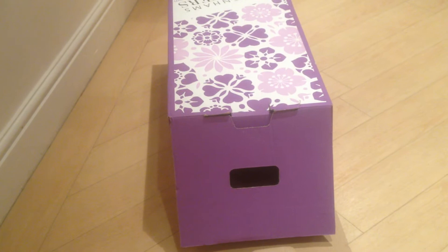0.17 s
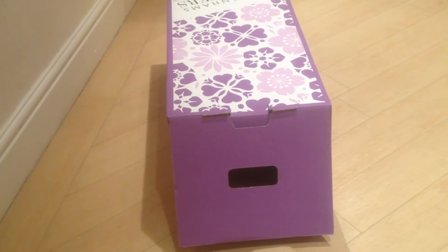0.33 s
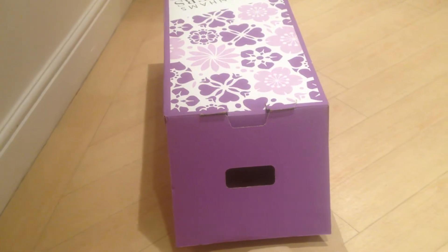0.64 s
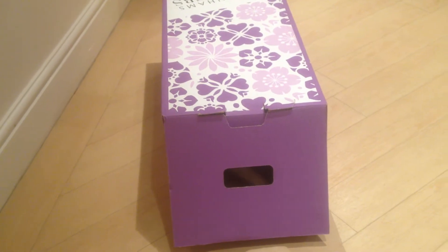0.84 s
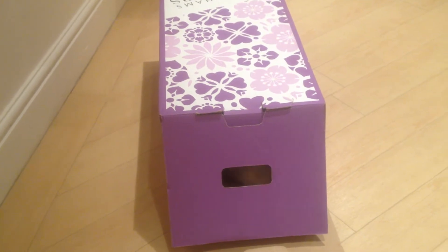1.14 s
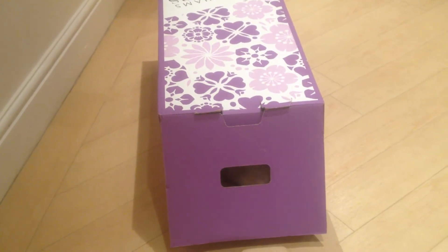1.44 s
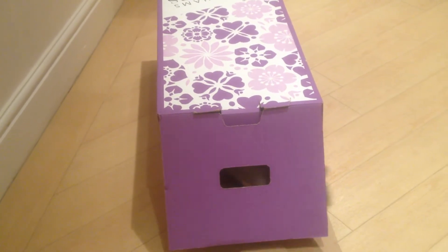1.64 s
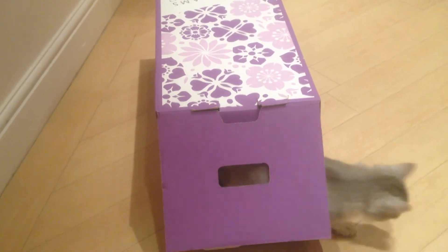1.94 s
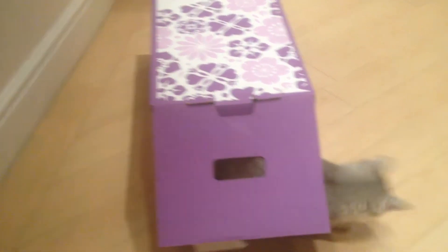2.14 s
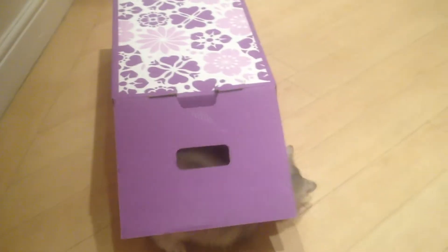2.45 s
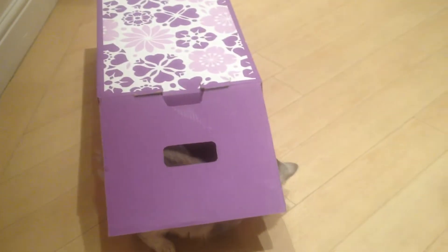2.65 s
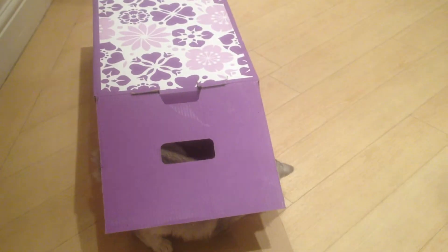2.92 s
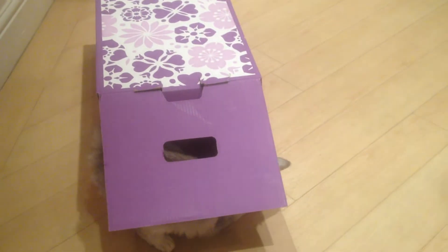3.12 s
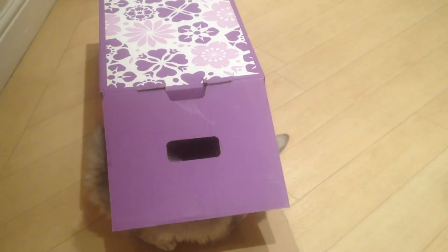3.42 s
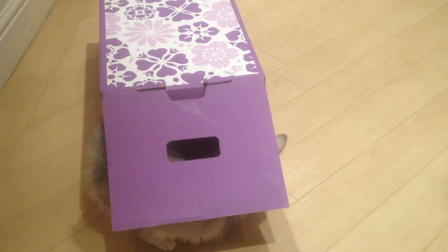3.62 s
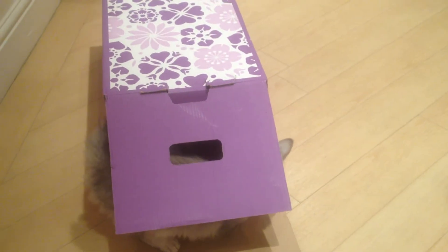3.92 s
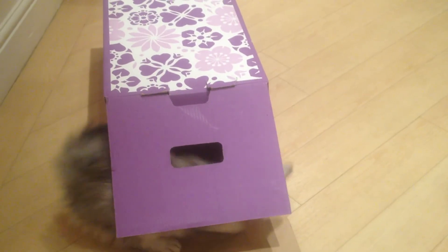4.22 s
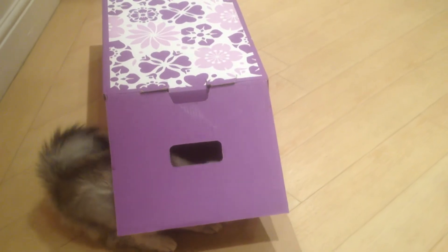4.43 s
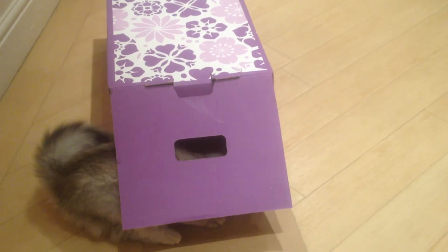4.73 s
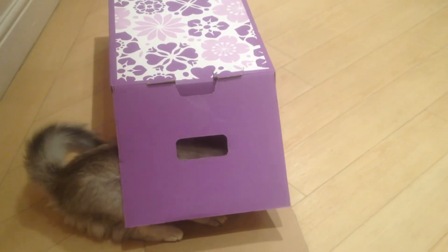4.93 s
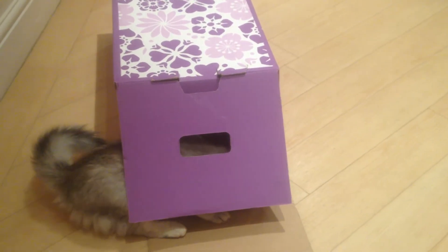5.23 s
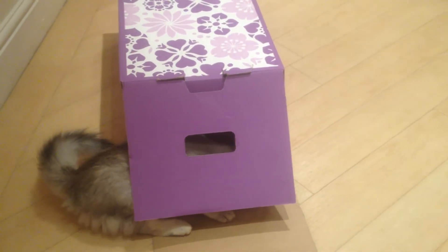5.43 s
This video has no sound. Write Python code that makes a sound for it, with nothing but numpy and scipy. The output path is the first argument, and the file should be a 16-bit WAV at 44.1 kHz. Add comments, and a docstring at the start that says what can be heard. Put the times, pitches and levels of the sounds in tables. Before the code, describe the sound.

Near-quiet room with a faint wavering low hum for a second. Then a kitten stirs in a cardboard box: rustles, a light knock, quick claw scratches. A dry flick and dull thuds follow, then a loud hollow clatter as the box corner drops on the wooden floor. Soft brushing continues, and finally the rim judders along in crisp snaps. Close small mono microphone, live reverberant room.

```python
"""A kitten shuffles about under an upturned cardboard box on a wooden floor, in a live room.
Claws scratch and fur brushes the card: filtered random catches under stroke envelopes.
Knocks, ringing panels and a flick are clicks or noise bursts through resonances; thuds are dying sines.
Late on, the box judders along on its rim: a row of edge snaps over fine scrabbling.
An appliance hums in the background: wavering sines over dull room noise."""
import sys
import numpy as np
from scipy import signal
from scipy.fft import rfft, irfft, next_fast_len
from scipy.io import wavfile
from scipy.ndimage import map_coordinates

SR = 44100
rng = np.random.default_rng(int(sys.argv[2]) if len(sys.argv) > 2 else 0)


def store_wav(level_fs):
    """Save 16-bit WAV to argv[1]."""
    pcm = np.round(np.clip(np.atleast_2d(level_fs), -1, 1) * 32767)
    wavfile.write(sys.argv[1], SR, pcm.T.astype(np.int16))


N = 245501
TIME = np.arange(N) / SR

# ringing of the card panels and the air between them: f/Hz, width/Hz, level/dB
PANEL_MODES = [(529.8, 8.2, 4.5), (845, 63, -5), (1050, 8.3, -31), (1238, 60, -2.5), (1604, 40, 0.5),
               (1710, 17, -12), (2000, 55, -1.5), (2280, 88, 0), (2730, 160, -4.5), (3000, 99, -5),
               (4370, 310, -4)]
# spectrum of the rim grinding on the floor: f/Hz, relative density/dB per Hz
RIM_COLOUR = [(150, -38), (300, 8), (700, 3), (1600, 1.5), (2700, 2), (5000, -6), (14000, -40)]


def from_db(db):
    """Turn decibels into an amplitude factor."""
    return 10 ** (np.asarray(db) / 20)


def rms_one(x):
    """Scale a steady sound to an RMS of 1."""
    return x / np.sqrt(np.mean(x ** 2) + 1e-20)


def unit_energy(x):
    """Scale a short sound to a summed square of 1."""
    return x / np.sqrt(np.sum(x ** 2) + 1e-20)


def at_hz(points, hz):
    """Read a table on a log-frequency axis."""
    freqs, values = np.transpose(points)
    return np.interp(np.log(np.maximum(hz, 1)), np.log(freqs), values)


def add(out, s, sound):
    """Mix a sound in at a time in seconds."""
    start = int(s * SR)
    out[start:start + len(sound)] += sound[:N - start]


def colour(x, spectrum, tilt_db=0):
    """Causal (minimum-phase) filter of unit energy with the given spectrum, tilted in dB per octave."""
    size = next_fast_len(len(x) + 4096, True) // 2 * 2
    hz = np.maximum(np.fft.rfftfreq(size, 1 / SR), 20)
    log_gain = np.log(from_db(at_hz(spectrum, hz) + tilt_db * np.log2(hz)))
    # keeping only the forward half of the cepstrum makes the filter causal
    cepstrum = irfft(log_gain)
    cepstrum[size // 2:] = 0
    cepstrum[0] = 0
    response = np.exp(rfft(2 * cepstrum))
    response /= np.sqrt(np.mean(abs(response) ** 2))
    return irfft(rfft(x, size) * response)[:len(x)]


def resonate(x, hz, width_hz):
    """Two-pole band-pass with gain 1 on top."""
    b, a = signal.iirpeak(hz, hz / min(width_hz, 0.3 * SR), fs=SR)
    return signal.lfilter(b, a, x + 1e-18)


def drift(rate):
    """Smooth random wander about 0, through a fresh normal value `rate` times a second."""
    knots = rng.standard_normal(4096)
    return map_coordinates(knots, [TIME * rate], order=2, mode="wrap")


def burst(t60, size=8192):
    """A dying flurry of tiny reflections, of unit energy; t60 in seconds."""
    return unit_energy(rng.standard_normal(size) * from_db(-60 * TIME[:size] / t60))


def click(size=8192):
    """A single sharp impulse."""
    return signal.unit_impulse(size)


def friction(per_s, spread_db):
    """Fibres catch and let go at random, with uneven force."""
    force = from_db(spread_db * np.minimum(rng.exponential(1, N), 4))
    signed = force * rng.choice([-1, 1], N)
    return rms_one(signed * (rng.random(N) < per_s / SR))


def swell(s, length):
    """Envelope of one stroke: it rises to 1 at time s and dies away."""
    rise_share = 0.44  # the rest of the length is the fall
    roundness = 1.93   # 1 = pointed top, 2 = bell
    before = (s - TIME) / rise_share
    after = (TIME - s) / (1 - rise_share)
    away = np.maximum(before, after) / length
    return np.exp(-np.minimum(away, 10) ** roundness)


def strokes(rows):
    """Gain over time from rows of t/s, level/dB, length/s."""
    return sum(from_db(db) * swell(s, length) for s, db, length in rows)


def box(x, modes=PANEL_MODES):
    """Resonances in parallel, ringing as the box or one part of it."""
    return sum(from_db(db) * resonate(x, hz, width) for hz, width, db in modes)


def background(waver_db=1.5, wander_rad=0.52, hum_trim_db=-0.5, air_db=-59):
    """A wavering appliance hum over dull room noise with low room resonances."""
    # partials of the hum: f/Hz, RMS level before the trim/dB
    hum_tones = [(129.2, -70.5), (199.2, -69.5), (279.9, -54), (489.9, -77), (1378, -78.5), (1513, -72.5)]
    # spectrum of the room noise: f/Hz, relative density/dB per Hz
    air_colour = [(25, -50), (64, -22), (82, -10), (200, -5.5), (340, -4), (420, -12), (520, -11.5),
                  (700, -21), (1050, -18), (1250, -20.5), (1500, -19.5), (2000, -21.5), (4400, -26.5),
                  (5500, -31.5), (8800, -33.5), (10500, -40.5), (15000, -36)]
    # low room resonances: f/Hz, width/Hz, RMS level/dB
    air_modes = [(84.6, 5.1, -73.5), (135, 12.5, -68), (237, 72, -68), (290.3, 19.7, -63)]
    hum = np.zeros(N)
    for hz, db in hum_tones:
        level = from_db(db + waver_db * drift(8.5)) * np.sqrt(2)
        hum += level * np.sin(2 * np.pi * hz * TIME + wander_rad * drift(17))
    air = from_db(air_db) * colour(rng.standard_normal(N), air_colour)
    for hz, width, db in air_modes:
        narrow = resonate(rng.standard_normal(N), hz, width)
        air += from_db(db) * rms_one(resonate(narrow, hz, 2 * width))
    return from_db(hum_trim_db) * hum + air


def rubbing(fur_trim_db=1, slide_trim_db=-3, ring_db=2):
    """Fur hisses finely on the card; the rim grinds more coarsely and rings the box. A shove drives both."""
    # fur brushes a wall: t at the height/s, level before the fur trim/dB, length/s
    brush_rows = [(1.026, -63.5, 0.028), (1.62, -66, 1), (1.93, -61.5, 0.032), (2.24, -57, 0.061),
                  (2.35, -62, 0.16), (2.448, -48.5, 0.03), (2.55, -65, 0.18), (2.94, -63.5, 0.15),
                  (3.17, -64, 0.29), (3.42, -56.5, 0.16), (3.65, -66.5, 0.45), (4.14, -66.5, 0.17),
                  (4.39, -62, 0.28), (5.1, -61, 0.27), (5.355, -53, 0.02)]
    # the kitten shoves and the rim slides: t at the height/s, level before the trims/dB, length/s
    shove_rows = [(1.22, -49.5, 0.11), (1.42, -48, 0.1), (1.85, -63, 1), (2.31, -55, 0.067),
                  (2.48, -53, 0.047), (2.86, -56, 0.3), (3.45, -51, 0.56), (4.46, -57, 0.17),
                  (4.85, -50, 0.26), (5.11, -50, 0.1), (5.38, -50.5, 0.057)]
    # spectrum of fur on card: f/Hz, relative density/dB per Hz
    fur_colour = [(400, -1), (1500, -1), (4000, 0.5), (8500, 1.5), (10500, -3), (15000, -4.5)]
    stir_s, rustle_db = 0.99, -78.5  # the kitten stirs; from then on its fur rustles (before the fur trim)
    fur_in_shove_db = -14.5          # its flank rubs the wall as it pushes
    fur = colour(friction(15000, 1.1), fur_colour)
    rim = colour(friction(5000, 3.6), RIM_COLOUR)
    rim = rms_one(rim + from_db(ring_db) * box(rim))
    push = strokes(shove_rows)
    rustle = from_db(rustle_db) * (TIME > stir_s)
    flank = from_db(fur_in_shove_db) * push
    brushing = np.sqrt(rustle ** 2 + strokes(brush_rows) ** 2 + flank ** 2)
    return from_db(fur_trim_db) * brushing * fur + from_db(slide_trim_db) * push * rim


def panel_rings(width_hz=200, burst_t60=0.066):
    """A claw taps one panel, or a knock leaves one panel ringing: a short burst through its resonance."""
    # single panels sounding: t/s, strength/dB, panel f/Hz
    panel_rows = [(1.102, -33, 3120), (1.168, -21.5, 2730), (1.3625, -12.5, 1025), (1.943, -34, 1850),
                  (2.3236, -26, 1580), (3.7231, -24, 1720)]
    out = np.zeros(N)
    for s, db, hz in panel_rows:
        panel = resonate(burst(burst_t60), hz, width_hz)
        panel = resonate(panel, hz, 4 * width_hz)
        add(out, s, from_db(db) * unit_energy(panel))
    return out


def scratches(skirt=5.7):
    """Claw strokes swell and die: a broad band of catches hisses, a narrow one squeaks."""
    # a claw strokes the card: t at the height/s, level/dB, length/s, centre f/Hz
    scratch_rows = [(1.111, -58.5, 0.035, 3300), (1.18, -44, 0.015, 2620), (1.197, -45.5, 0.054, 2600),
                    (1.445, -45.5, 0.013, 2120), (1.484, -42.5, 0.07, 3860), (1.498, -44.5, 0.015, 3000),
                    (1.523, -42.5, 0.023, 3200), (1.551, -46.5, 0.072, 3470), (2.647, -48.5, 0.054, 2190),
                    (3.503, -46.5, 0.047, 2020), (4.345, -55.5, 0.045, 4400), (4.389, -48.5, 0.029, 4900)]
    # a paw drags and the card squeaks faintly: t at the height/s, level/dB
    squeak_rows = [(2.335, -59), (3.53, -56.5), (3.63, -60), (3.77, -58)]
    # spectrum of claw on card: f/Hz, relative density/dB per Hz
    scratch_colour = [(200, -10), (700, -0.5), (1500, 3), (2500, 2), (4600, -1), (5600, -2.5), (8500, -1.5),
                      (10300, -6), (15000, 0)]
    width_share = 0.69  # bandwidth of a hiss as a share of its centre
    squeak_hz, squeak_width_hz, squeak_s = 1710, 210, 0.075
    catches_per_s, spread_db, rough_db = 6000, 2.0, 2.1
    grain = colour(friction(catches_per_s, spread_db), scratch_colour)
    grain = grain * from_db(rough_db * drift(220))
    hisses = [(s, db, length, hz, width_share * hz) for s, db, length, hz in scratch_rows]
    squeaks = [(s, db, squeak_s, squeak_hz, squeak_width_hz) for s, db in squeak_rows]
    out = np.zeros(N)
    for s, db, length, hz, width in hisses + squeaks:
        band = resonate(resonate(grain, hz, width), hz, skirt * width)
        out += from_db(db) * swell(s, length) * rms_one(band)
    return out


def thuds(contact_s=0.004, lowest_hz=122):
    """A soft push wakes only the slow modes of the walls; so small a box radiates no deep bass."""
    # soft weight lands against the walls, or the box wobbles after it: t/s, level/dB
    thud_rows = [(1.199, -44.5), (1.363, -38), (1.385, -45), (2.4611, -27), (2.489, -37), (2.508, -37.5),
                 (2.5254, -31), (2.632, -38.5), (3.516, -39.5), (4.775, -43.5), (4.858, -39)]
    # slow modes of the walls: f/Hz, level/dB, t60/s
    wall_modes = [(155, -19, 0.26), (170, -8.5, 0.13), (214.6, 0.5, 0.086), (255.3, 4, 0.073),
                  (372.3, -11.5, 0.083)]
    out, t = np.zeros(N), TIME[:SR // 2]
    walls = sum(from_db(db - 60 * t / t60) * np.sin(2 * np.pi * hz * t) for hz, db, t60 in wall_modes)
    soft_onset = 1 - np.exp(-t / contact_s)
    for s, db in thud_rows:
        add(out, s, -from_db(db) * walls * soft_onset)
    return signal.sosfilt(signal.butter(4, lowest_hz, "high", fs=SR, output="sos"), out)


def ticks(centre_hz=9500, width_hz=7000, t60=0.0069):
    """A single fibre or claw tip ticks thinly, too quick and light to move the panels."""
    # ticks: t/s, strength/dB
    tick_rows = [(1.2055, -35), (1.2535, -36), (1.612, -35), (2.035, -40), (4.378, -32), (4.401, -32)]
    out = np.zeros(N)
    for s, db in tick_rows:
        add(out, s, from_db(db) * unit_energy(resonate(burst(t60), centre_hz, width_hz)))
    return out


def knocks(rattle_db=4, contacts_per_s=2500, ring_db=0, size=8192):
    """The corner meets the floor, chatters in quick contacts and sets its flap ringing."""
    # a corner knocks or bounces on the floor: t/s, strength/dB, tilt/dB per octave, rattle t60/s
    knock_rows = [(1.3640, -14.5, 6.5, 0.11), (1.396, -19, 4, 0.06), (2.6267, -17.5, 5, 0.081),
                  (3.225, -12, 0, 0.038), (3.2270, -7.5, -2.5, 0.037), (3.231, -7.5, -6.5, 0.056),
                  (3.2361, -3.8, -0.5, 0.11), (3.2442, -9, -4, 0.13), (3.2739, -12.5, 0.5, 0.12),
                  (3.2817, -9.5, 0.5, 0.11), (3.298, -20.5, -3, 0.13), (3.3305, -17.5, -1, 0.12),
                  (4.321, -26, 0, 0.18), (4.6131, -27, 0.5, 0.11)]
    # spectrum of the blow before tilting: f/Hz, relative density/dB per Hz
    knock_colour = [(45, -66), (110, -40), (200, -27), (280, -1), (400, -11), (490, -7), (630, -8),
                    (860, 3), (1250, -5), (1800, -2.5), (2100, -6.5), (2500, -3.5), (3200, -12.5),
                    (3800, -16), (5000, -21), (6500, -28.5), (8500, -29), (15000, -55)]
    # the stiff flap at the knocking corner: f/Hz, width/Hz, level/dB
    flap_modes = [(281, 10, 0.5), (476, 20, 8), (870, 18, -4), (1059, 11, 0), (1295, 27, 8)]
    out = np.zeros(N)
    for s, db, tilt_db, t60 in knock_rows:
        chatter = unit_energy(burst(t60) * (rng.random(size) < contacts_per_s / SR))
        blow = colour(click() + from_db(rattle_db) * chatter, knock_colour, tilt_db)
        ringing = blow + from_db(ring_db) * box(blow, flap_modes)
        add(out, s, from_db(db) * unit_energy(ringing))
    return out


def snap(crack_db, body_db, edge_hz, edge_width_hz, snap_db=6, bounce_db=-3, bounce_t60=0.044,
         flutter_db=-6, flutter_t60=0.028, crack_t60=0.0028, crack_tail_db=-6,
         crack_lag_s=0.000922, ring_db=4.0, modes_db=12):
    """The stiff edge is flicked, bounces and sets the box ringing; it cracks in the treble as it lands."""
    # spectrum of the crack: f/Hz, relative density/dB per Hz
    crack_colour = [(500, -27), (3000, -7.5), (8000, 1), (10500, -4.5), (15000, -10.5)]
    # spectrum of the air in the box: f/Hz, relative density/dB per Hz
    hollow_colour = [(90, -29), (200, 2.5), (350, -4.5), (650, -13), (1250, -6.5), (1700, -24.5),
                     (2700, -7), (5000, -19), (14000, -29)]
    bounce = from_db(bounce_db) * burst(bounce_t60)
    flutter = from_db(flutter_db) * burst(flutter_t60)
    shudder = from_db(body_db / 2) * (bounce + flutter)
    edge = resonate(click() + shudder, edge_hz, edge_width_hz)
    edge = unit_energy(resonate(edge, edge_hz, 3300))
    crack = unit_energy(colour(burst(crack_t60) + from_db(crack_tail_db) * shudder, crack_colour))
    late_crack = np.pad(crack, (int(crack_lag_s * SR), 0))[:len(crack)]
    hollow = colour(burst(0.054), hollow_colour)
    ring = unit_energy(hollow + from_db(modes_db) * box(hollow))
    return from_db(snap_db) * (edge + from_db(body_db + ring_db) * ring + from_db(crack_db) * late_crack)


def flick(lowest_hz=2100):
    """A claw flicks the edge of the card: one dry snap, with little below the pitch of the edge."""
    flick_s, flick_db = 2.4347, -15  # the level is before the snap's own gain
    out = np.zeros(N)
    sound = snap(crack_db=-19, body_db=-13, edge_hz=2530, edge_width_hz=1400)
    add(out, flick_s, from_db(flick_db) * sound)
    return signal.sosfilt(signal.butter(4, lowest_hz, "high", fs=SR, output="sos"), out)


def judder():
    """The rim sticks and slips as the box is pushed along; the snaps grow crisper, up to a limit."""
    # the rim catches on the floor and slips free: t/s, level before the snap's own gain/dB
    slip_rows = [(4.7148, -19.5), (4.7185, -32), (4.7639, -32), (4.7952, -24.5), (4.8052, -31.5),
                 (4.833, -40), (4.8691, -38), (4.889, -25), (4.9287, -29.5), (4.9812, -33.5), (5.0062, -27),
                 (5.0530, -25), (5.1136, -39), (5.1639, -31), (5.2098, -27), (5.3293, -21)]
    first_crack_db, crack_rise_db_per_s, full_crack_db = -19.5, 50, -2.5
    edge_hz, edge_scatter = 2680, 0.12  # each slip catches another spot of the edge, at another pitch
    push_s = slip_rows[0][0]
    out = np.zeros(N)
    for s, db in slip_rows:
        crack_db = min(first_crack_db + crack_rise_db_per_s * (s - push_s), full_crack_db)
        spot_hz = edge_hz * np.exp(edge_scatter * rng.uniform(-0.9, 1))
        add(out, s, from_db(db) * snap(crack_db, body_db=-2, edge_hz=spot_hz, edge_width_hz=1600))
    return out


def scrabble(edge_hz=3100, edge_width_hz=2200, catch_t60=0.0072, ring_db=-2, size=2048):
    """Between the big slips the rim keeps catching in small ones, which keep the panels ringing."""
    from_s, to_s = 4.725, 5.2
    start_db, fade_db_per_s = -55, 4.5  # they fade as the box gets moving
    catches_per_s, spread_db = 260, 1.8
    decay = from_db(-60 * TIME[:size] / catch_t60)
    force = signal.fftconvolve(abs(friction(catches_per_s, spread_db)), decay)[:N]
    catches = force * rng.standard_normal(N)
    edge = resonate(catches, edge_hz, edge_width_hz)
    grit = rms_one(edge + from_db(ring_db) * box(colour(catches, RIM_COLOUR)))
    moving = (TIME > from_s) & (TIME < to_s)
    return from_db(start_db - fade_db_per_s * (TIME - from_s)) * moving * grit


def room(x, build_s=0.0016):
    """Diffuse reverberation that builds quickly and dies at its own pace in each octave."""
    # reverberation time: f/Hz, t60/s
    room_t60 = [(150, 0.38), (500, 0.42), (1500, 0.88), (4000, 0.89), (8000, 0.78), (14000, 0.19)]
    t = TIME[:SR]
    white = rfft(rng.standard_normal(SR))  # one second, so the bins are 1 Hz apart
    octave = np.round(np.log2(np.maximum(np.arange(len(white)), 64)))
    tail = np.zeros(SR)
    for k in np.unique(octave):
        tail += irfft(white * (octave == k), SR) * from_db(-60 * t / at_hz(room_t60, 2 ** k))
    return signal.fftconvolve(x, unit_energy(tail * (1 - np.exp(-t / build_s))))[:N]


def scene(room_db=-9, thud_room_db=-10):
    """The box in front of the microphone, its reverberation, and the background."""
    # the walls soak up the top: f/Hz, relative level/dB
    room_colour = [(100, 8.5), (3500, -2.5), (8000, 0), (11000, -3), (15000, -19)]
    card = flick() + judder() + scrabble() + knocks() + panel_rings() + ticks() + scratches() + rubbing()
    weight = thuds()
    into_room = from_db(room_db) * card + from_db(thud_room_db) * weight
    echo = room(colour(into_room, room_colour))
    mono = card + weight + echo + background()
    return np.array([mono, mono])


def record(dry):
    """A small mono microphone: the deep bass rolls off and the top is cut."""
    thin = signal.sosfilt(signal.butter(2, 42, "high", fs=SR, output="sos"), dry)
    return signal.sosfilt(signal.ellip(12, 0.1, 70, 15350, fs=SR, output="sos"), thin)


dry = scene()
out = record(dry)
store_wav(out)
```